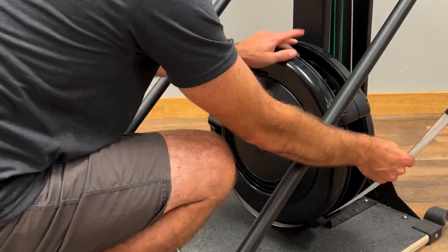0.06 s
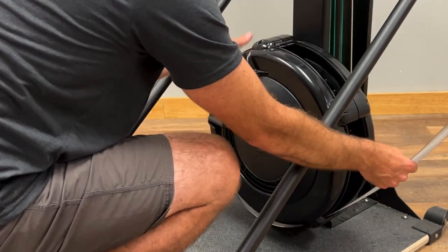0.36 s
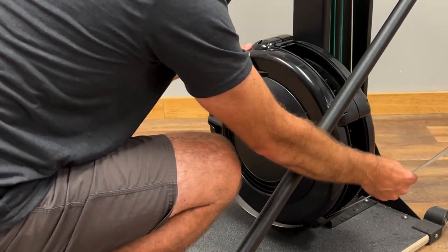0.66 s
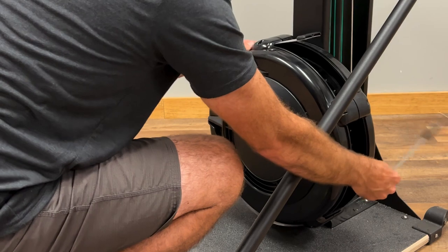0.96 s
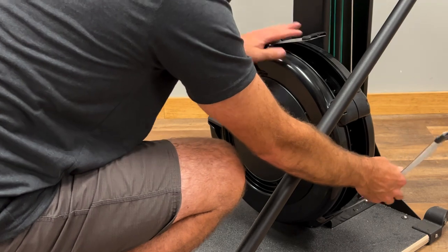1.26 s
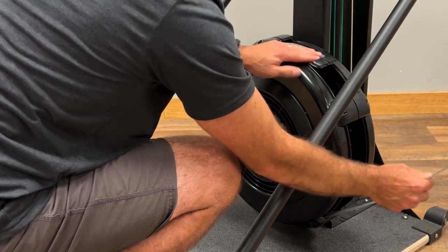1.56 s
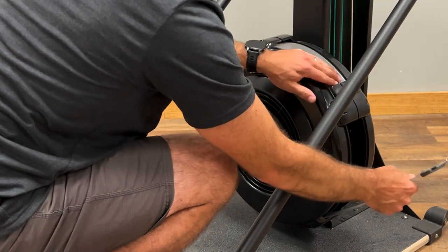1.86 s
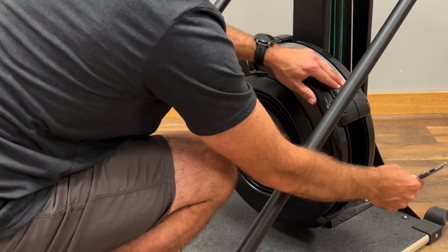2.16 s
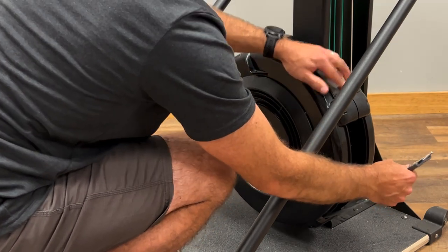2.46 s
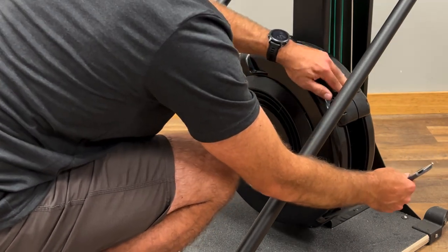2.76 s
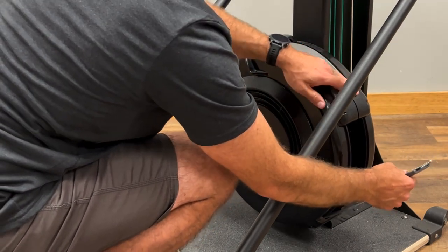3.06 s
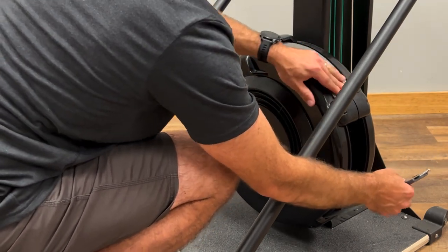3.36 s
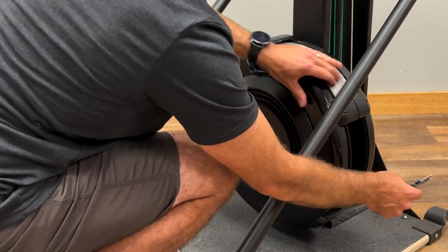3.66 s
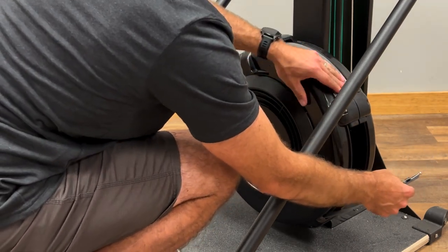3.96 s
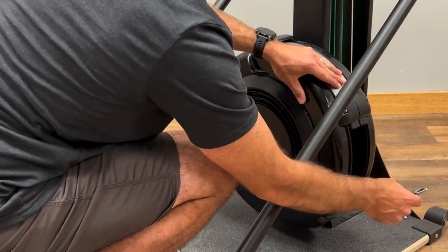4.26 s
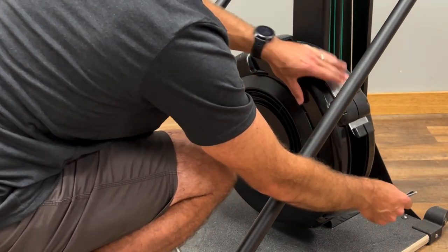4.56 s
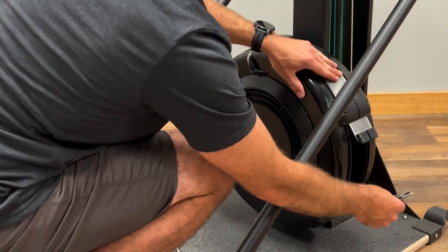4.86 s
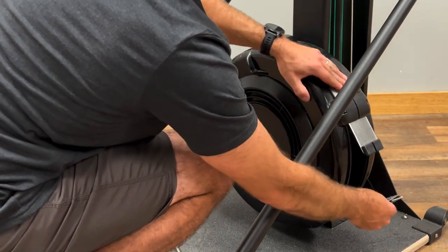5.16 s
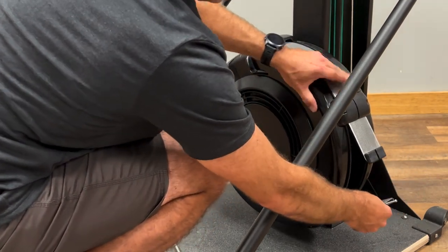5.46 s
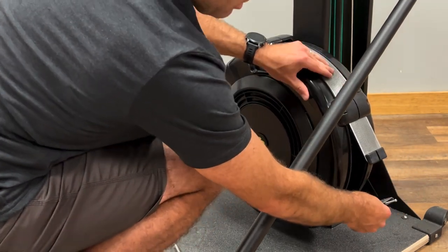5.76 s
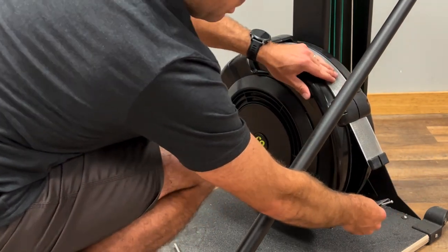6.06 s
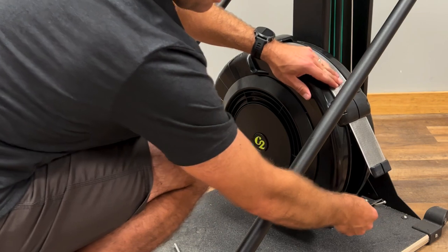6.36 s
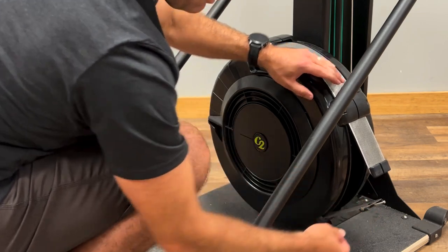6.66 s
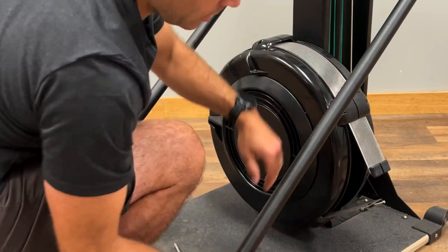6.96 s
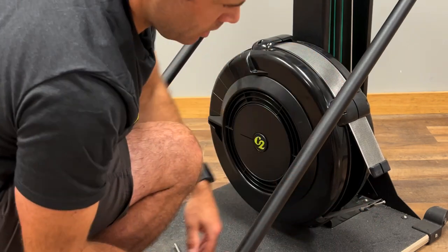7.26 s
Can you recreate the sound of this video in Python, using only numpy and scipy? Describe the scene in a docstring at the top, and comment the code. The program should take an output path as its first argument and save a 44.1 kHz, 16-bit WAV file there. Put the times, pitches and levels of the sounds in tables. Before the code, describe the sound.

A thin steel strip scrapes and rattles around a hollow plastic cover, with irregular knocks, two of them loud and booming.

```python
"""Steel strip around a flywheel cover

A small hard-walled room, one microphone on the right channel; the left input is idle. A thin steel
strip is fed by hand around the hollow plastic cover of a flywheel. It catches under loose fasteners
and slips free: chattering knocks, short scuffs, and a light hiss and thin squeaks as it slides.
Each place on the cover rings a little differently, and the two hardest knocks make it boom."""
import sys
import numpy as np
from scipy import signal
from scipy.fft import rfft, irfft, next_fast_len
from scipy.io import wavfile

SR = 44100
rng = np.random.default_rng(int(sys.argv[2]) if len(sys.argv) > 2 else 0)


def materialize(psi):
    """Save the field psi as 16-bit PCM at rate SR to the path in sys.argv[1].

    A 1-D psi becomes a single channel; in a 2-D psi each row is a channel.
    """
    bounded = np.clip(np.atleast_2d(psi).T, -1, 1)
    quanta = np.round(bounded * 32767).astype(np.int16)
    wavfile.write(sys.argv[1], SR, quanta)


N = 322808
T = np.arange(N) / SR


def undb(db):
    """Decibels to gain."""
    return 10 ** (np.asarray(db) / 20)


def unit(x):
    """Scale to unit energy."""
    return x / np.sqrt(np.sum(x ** 2) + 1e-30)


def fade(t, t60):
    """Amplitude that loses 60 dB in t60 seconds."""
    return np.exp(-np.log(1000) * t / t60)


def on_log_axis(hz, points):
    """Read (Hz, value) points along straight lines in log frequency."""
    f, value = np.transpose(points)
    return np.interp(np.log(np.maximum(hz, 1)), np.log(np.maximum(f, 1)), value)


def colour(x, points):
    """Causal filter with the given (Hz, dB) shape."""
    size = 2 * next_fast_len(x.shape[-1])
    gain = undb(on_log_axis(np.fft.rfftfreq(size, 1 / SR), points))
    cepstrum = irfft(np.log(gain))
    cepstrum[1:size // 2] *= 2  # fold to minimum phase
    cepstrum[size // 2 + 1:] = 0
    return irfft(rfft(x, size) * np.exp(rfft(cepstrum)))[..., :x.shape[-1]]


def split(x, edges_hz):
    """Cut a sound into adjoining bands, lowest first."""
    bands = []
    for hz in edges_hz:
        low, high = (signal.butter(2, hz, kind, fs=SR, output="sos") for kind in ("low", "high"))
        bands.append(signal.sosfilt(np.tile(low, (2, 1)), x))
        x = signal.sosfilt(np.tile(high, (2, 1)), x)
    return bands + [x]


def grit(count, per_s, spread_db):
    """Tiny contacts at random moments: many weak ones, a few strong."""
    touch = rng.random(count) < per_s / SR
    return touch * rng.standard_normal(count) * undb(spread_db * np.minimum(rng.exponential(size=count), 4))


# Room tone at the microphone. Each row: frequency in Hz, relative level in dB.
ROOM_TONE = [(10, -2), (22, 3), (42, -7.5), (65, -19), (90, -18.5), (125, -20.5), (170, -23), (330, -22.5),
             (700, -38.5), (2000, -40.5), (5000, -53), (9000, -46.5), (15000, -58)]

def still_room(level_db=-58):
    """Faint rumble and air."""
    return np.sqrt(N) * unit(colour(rng.standard_normal(N), ROOM_TONE)) * undb(level_db)


# Buzz on the left input. Each row: frequency in Hz, level in dB.
BUZZ = [(250, -104), (500, -113), (750, -109)]

def idle_input(hiss_db=-91):
    """Electrical hiss and a trace of buzz."""
    buzz = sum(np.sqrt(2) * undb(db) * np.sin(2 * np.pi * hz * T) for hz, db in BUZZ)
    return undb(hiss_db) * rng.standard_normal(N) + buzz


# Reverberation of the small room. Each row: frequency in Hz, t60 in seconds.
ROOM_DECAY = [(100, 1), (300, 0.99), (1000, 0.7), (3000, 0.48), (8000, 0.46), (15000, 0.31)]

def room_tail(t):
    """Diffuse echoes off the hard walls; the treble dies first."""
    octaves_hz = np.geomspace(100, 12800, 8)
    bands = split(rng.standard_normal(len(t)), octaves_hz[:-1] * np.sqrt(2))
    return unit(sum(band * fade(t, t60) for band, t60 in zip(bands, on_log_axis(octaves_hz, ROOM_DECAY))))


# The cover with the strip on it. Each row: mode in Hz, relative level in dB, t60 in seconds.
COVER_MODES = [(92, -10, .3), (138, -9, .35), (258, -10, .3), (315, -11, .25), (443, -5, .2),
               (488, -3, .18), (545, -6, .16), (656, 0, .2), (869, -1, .18), (1013, 0, .2), (1133, -3, .16),
               (1400, -1, .14), (1544, -4, .15), (1737, -5, .15), (1856, -4, .14), (2205, -6, .12),
               (2446, -4, .12), (2988, -5, .1)]
# Colour of a contact at the microphone. Each row: frequency in Hz, gain in dB.
CONTACT_COLOUR = [(45, -27), (90, -5.5), (135, -5), (185, -8.5), (270, -2), (600, -2), (1050, -3.5),
                  (1700, -10), (2300, -9), (3300, -16), (4600, -19.5), (6500, -17.5), (9600, -13.5),
                  (11300, -25.5), (13000, -32.5), (15500, -48)]

def cover_response(crack_db=-2, flutter_db=-2, modes_db=-14, room_db=-5, build_s=.0093):
    """A tap at one place: a crack, crowded shell modes, the fluttering strip, clear modes, the room."""
    t = T[:SR * 3 // 4]
    crack, shell, flutter = (unit(rng.standard_normal(len(t)) * fade(t, t60)) for t60 in (.016, .052, .21))
    phases = rng.uniform(0, 2 * np.pi, len(COVER_MODES))
    modes = sum(undb(db) * fade(t, t60) * np.sin(2 * np.pi * hz * t + phase)
                for (hz, db, t60), phase in zip(COVER_MODES, phases))
    direct = undb(crack_db) * crack + shell + undb(flutter_db) * flutter + undb(modes_db) * unit(modes)
    room = room_tail(t) * (1 - np.exp(-t / build_s))
    return colour(direct + undb(room_db) * room, CONTACT_COLOUR)


def add_contact(forces, start_s, push, db, bright_db):
    """Lay a push into the thud, body, clack and tick bands; a harder one has more treble, less thud."""
    thud_db, clack_db, tick_db = -20 - .21 * bright_db, -9.5 + bright_db, -17.5 + 1.4 * bright_db
    i = max(int(start_s * SR), 0)
    push = push[:N - i]
    forces[:, i:i + len(push)] += np.outer(undb(db + np.array([thud_db, 0, clack_db, tick_db])), push)


# The strip slips free and strikes the cover.
# Each row: time in seconds, level in dB, brightness in dB, chatter decay in seconds.
KNOCKS = [(.029, -6, -7, 0.01), (.04, -6, -3, 0.008), (.092, -13, -5, .008), (.112, -8.5, -6.5, 0.016),
          (.566, 0, 1, 0.0098), (.618, -12.5, -2.5, 0.014), (.755, -10.5, -5, 0.011), (.94, 16.5, 7, .016),
          (1.329, -23, 6, 0.017), (1.476, -12.5, 9, 0.013), (1.533, -11.5, 4, 0.006), (1.707, 0, 0, 0.0078),
          (1.821, -11.5, -12, 0.0072), (1.924, -4.5, 1.5, 0.01), (2.198, -16, -11, 0.0013),
          (2.252, -16, -9.5, .008), (2.492, -9.5, -1, 0.0095), (2.609, -9, 7, 0.008),
          (2.68, -15.5, -11, 0.0096), (2.834, -14, 2.5, .009), (3.016, -12.5, -5.5, 0.0022),
          (3.044, -12.5, -1.5, 0.0081), (3.279, -14.5, -14.5, 0.0016), (3.344, -16, -1, 0.018),
          (3.407, -19, -2, 0.0048), (3.455, -13.5, 0, 0.0056), (3.514, -1.5, -1.5, 0.01),
          (3.564, -8.5, 1, 0.0066), (3.779, -17, -9.5, .008), (3.846, -4.5, -6, 0.0055),
          (3.91, -14, -4.5, 0.0047), (4.138, -38, 12.5, .008), (4.286, -11, 5, 0.006),
          (4.351, -11.5, -5, 0.0095), (4.449, .5, 5.5, 0.0078), (4.469, 11, 7, 0.011), (4.7, -5, 0, 0.0013),
          (4.788, -16, -3.5, 0.0069), (4.842, -10.5, -1, 0.015), (5.434, -20, -6, 0.0095),
          (5.471, -23, -1.5, 0.0066), (5.543, -11, -3, 0.013), (6.72, -37.5, -9, 0.0034),
          (6.776, -26, -15, 0.011), (6.839, -31.5, -0.5, 0.0027), (7.291, -46.5, 9.5, .002)]

def knocks(lead_share=.39, clean_s=.0019):
    """Force of the strip as it scrapes up to each blow, strikes and chatters."""
    forces, strike = np.zeros((4, N)), SR // 40
    t = T[:SR // 8] - T[strike]
    for s, db, bright_db, chatter_s in KNOCKS:
        lead_s = lead_share * chatter_s / (1 + undb(db))  # hard blows come abruptly
        envelope = np.exp(np.minimum(t / lead_s, -t / chatter_s))
        push = unit(grit(len(t), per_s=4500, spread_db=2) * envelope)
        push[strike] += clean_s / chatter_s  # short chatter leaves a clean blow
        add_contact(forces, s - T[strike], unit(push), db, bright_db)
    return forces


def stroke(start_s, length_s, attack_s=.043, release_s=.055):
    """One push of the hand: it gathers speed, holds and dies away."""
    return np.exp(-np.maximum(start_s - T, 0) / attack_s - np.maximum(T - start_s - length_s, 0) / release_s)


# The hand feeds the strip on. Each row: start and length in seconds, rub and hiss levels in dB.
STROKES = [(0.043, .13, -57.5, -70), (1.124, 0.12, -51, -68.5), (1.695, 0.3, -47, -60),
           (2.21, 0.045, -57.5, -66.5), (2.465, 0.22, -54.5, -76), (2.962, 0.13, -51, -71.5),
           (3.355, 0.72, -56.5, -75.5), (3.86, 0.13, -50.5, -62.5), (4.163, 0.046, -68, -75.5),
           (4.31, 0.33, -53, -68), (4.884, 0.35, -56, -62), (5.32, 0.054, -51, -57),
           (5.483, 0.21, -68, -79), (6.07, 0.072, -63.5, -66.5), (6.319, 0.029, -55, -60),
           (6.453, 0.1, -86, -74.5), (7.045, 0.19, -69.5, -70.5)]
# Colour of the sliding steel edge. Each row: frequency in Hz, relative level in dB.
EDGE_COLOUR = [(1500, -13.5), (3000, -12), (5000, -13.5), (6500, -9.5), (8000, -5), (9600, -8.5),
               (11000, -15), (13000, -24.5), (15500, -29)]

def sliding(responses, rub_top_hz=2800):
    """Stick and slip rubs the cover at several places; the edge hisses over the grain of the plastic."""
    power = sum(np.outer(undb(dbs), stroke(s, length_s)) ** 2 for s, length_s, *dbs in STROKES)
    rub_level, hiss_level = np.sqrt(power)
    lowpass = signal.butter(2, rub_top_hz, fs=SR, output="sos")
    rub = np.zeros(N)
    for response in responses:
        slips = unit(grit(N, per_s=300, spread_db=3)) * rub_level
        rub += signal.fftconvolve(slips, unit(signal.sosfilt(lowpass, response)))[:N]
    grain = unit(grit(N, per_s=5000, spread_db=3)) + unit(rng.standard_normal(N))
    hiss = unit(colour(grain, EDGE_COLOUR)) * hiss_level
    return np.sqrt(N) * (rub / np.sqrt(len(responses)) + hiss)


# Thin squeaks. Each row: middle in seconds, top pitch in Hz, half length in seconds, level in dB.
SQUEAKS = [(0.4, 9300, 0.071, -83.5), (2.358, 10100, .13, -80), (4.931, 11660, .19, -82),
           (7.081, 9900, 0.25, -79), (7.281, 10360, 0.11, -80.5)]
# The tones of one squeak. Each row: pitch ratio, mean glide in Hz per second, relative level in dB.
SQUEAK_TONES = [(1, 10070, 5), (1.08, 11900, 1), (1.2, 15200, -1), (1.402, 22000, -7)]

def squeaks(width_hz=70, scatter_s=.018, detune=.012):
    """The rubbing strip squeaks in ragged, arching tones, each a little off in time and pitch."""
    out, lowpass = np.zeros(N), signal.butter(2, width_hz, fs=SR, output="sos")
    for s, top_hz, half_s, db in SQUEAKS:
        for ratio, glide_hz_per_s, tone_db in SQUEAK_TONES:
            late, sharp = rng.standard_normal(2)
            from_top = (T - s - scatter_s * late) / half_s
            on = abs(from_top) < 1
            droop = from_top[on] ** 2
            waver = np.sqrt(SR) * unit(signal.sosfilt(lowpass, rng.standard_normal(SR)))[:on.sum()]
            hz = ratio * top_hz * (1 + detune * sharp) - glide_hz_per_s * half_s * droop
            tone = np.sqrt(2) * np.sin(2 * np.pi * np.cumsum(hz) / SR)
            out[on] += undb(db + tone_db) * tone * (1 - droop) * waver
    return out


# The strip jerks forward against the plastic.
# Each row: peak time in seconds, level in dB, brightness in dB, swell and fade time in seconds.
SCUFFS = [(.391, -24, -10.5, .016), (.79, -6.5, -4, .028), (1.459, -18.5, 2.5, 0.0089),
          (1.486, -6.5, -11, 0.021), (1.561, -2, -0.5, 0.0099), (1.943, -5, 2.5, 0.0074),
          (2.519, -15.5, -28, 0.0095), (2.616, -10, -1, 0.025), (2.995, -12.5, -20, 0.084),
          (3.234, -18, -3, 0.015), (3.375, -13.5, -8, 0.023), (3.542, -1, -7, 0.023),
          (3.944, -1.5, 3, 0.013), (4.299, -4, -1, .007), (4.447, -12, 5, 0.0081), (4.488, 3.5, -7, 0.026),
          (5.374, -18, -4, 0.017), (5.87, -15, -5.5, 0.0055), (6.363, -22, 1.5, 0.011)]

def scuffs():
    """Force of runs of tiny slips, each swelling and fading."""
    forces, t = np.zeros((4, N)), T[:SR // 4]
    middle_s = t[-1] / 2
    for s, db, bright_db, width_s in SCUFFS:
        push = grit(len(t), per_s=2500, spread_db=3) * np.exp(-abs(t - middle_s) / width_s)
        add_contact(forces, s - middle_s, unit(push), db, bright_db)
    return forces


# The whole cover booms under the two hardest knocks.
# Each row: start in seconds, pitch in Hz, level in dB, t60 in seconds.
BOOMS = [(0.945, 128, -31, 0.38), (4.471, 91.6, -35.5, 0.44)]

def booms(swell_s=.012):
    """A low bending mode of the cover swells and dies away."""
    out = np.zeros(N)
    for s, hz, db, t60 in BOOMS:
        t = np.maximum(T - s, 0)
        out += undb(db) * np.sin(2 * np.pi * hz * t) * fade(t, t60) * (1 - np.exp(-t / swell_s))
    return out


# The free steel strip. Each row: mode in Hz, relative level in dB, t60 in seconds.
STRIP_MODES = [(2460, 0, 0.46), (3165, -9, .4), (3800, -11, .45), (4430, -3.5, 0.96), (5066, -6, .45),
               (6390, -8, .3), (7068, -17, .65)]
# The strip is left free to ring. Each row: start in seconds, level in dB.
TWANGS = [(2.611, -65), (6.43, -77.5)]

def twangs():
    """The steel rings on thinly in its own modes."""
    t, flicks = T[:SR], np.zeros(N)
    for s, db in TWANGS:
        flicks[int(s * SR)] = undb(db)
    steel = sum(undb(db) * fade(t, t60) * np.sin(2 * np.pi * hz * t) for hz, db, t60 in STRIP_MODES)
    return signal.fftconvolve(flicks, steel)[:N]


def scene(places=5, band_edges_hz=(200, 1500, 4500)):
    """Each tiny blow rings one of several places on the cover; the microphone is on the right."""
    responses = [cover_response() for _ in range(places)]
    place = rng.integers(places, size=N)
    forces = knocks() + scuffs()
    blows = np.zeros(N)
    for k, response in enumerate(responses):
        for force, band in zip(forces, split(response, band_edges_hz)):
            blows += signal.fftconvolve(force * (place == k), unit(band))[:N]
    left = idle_input()
    right = blows + booms() + twangs() + sliding(responses) + squeaks() + still_room()
    return np.array([left, right])


def record(dry, ceiling=.45, top_hz=15700):
    """The recorder rounds the highest peaks and cuts the top."""
    lowpass = signal.ellip(8, .2, 70, top_hz, fs=SR, output="sos")
    return signal.sosfilt(lowpass, ceiling * np.tanh(dry / ceiling))


dry = scene()
out = record(dry)
materialize(out)
```